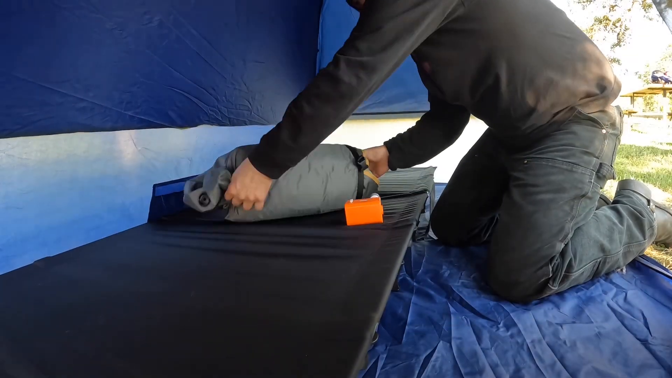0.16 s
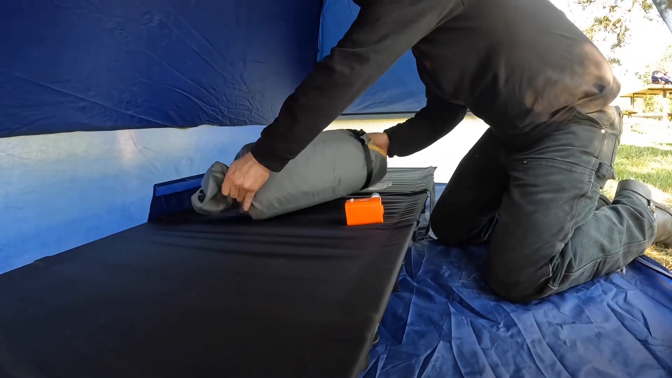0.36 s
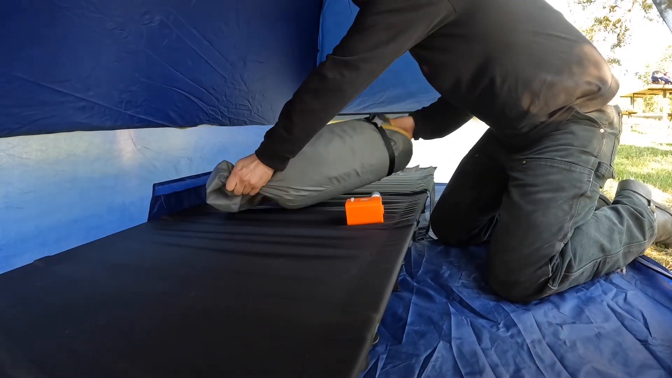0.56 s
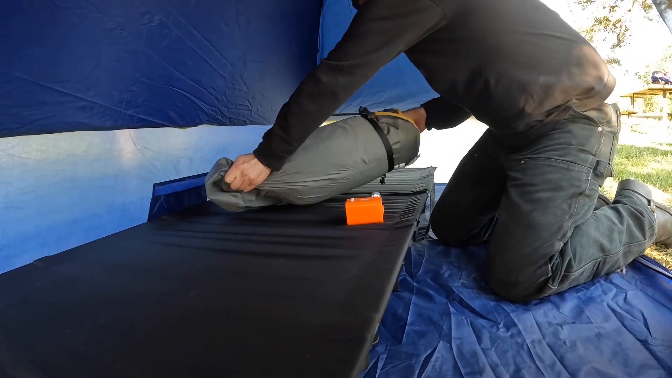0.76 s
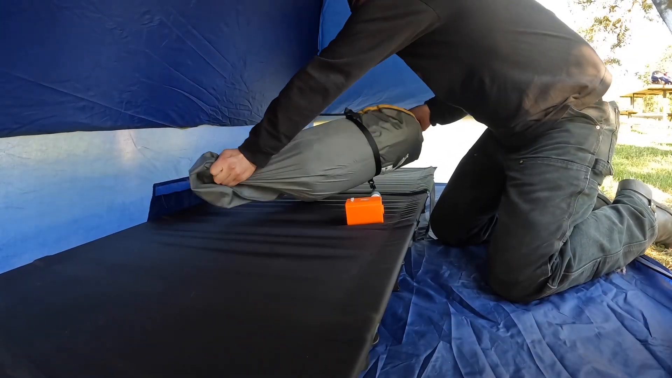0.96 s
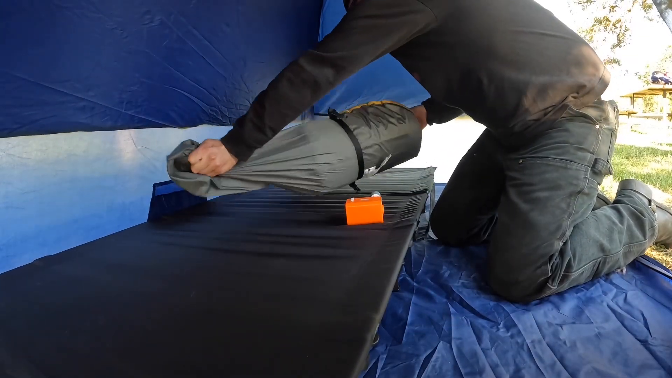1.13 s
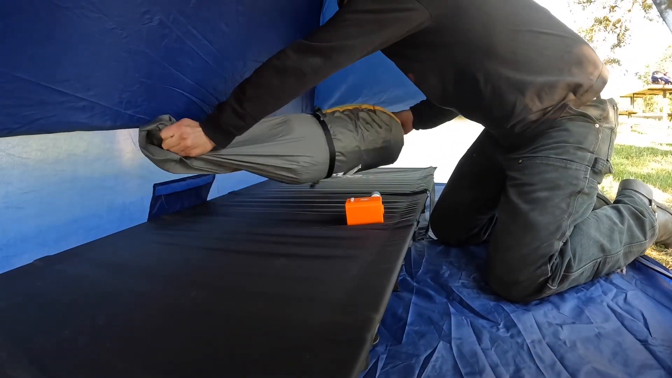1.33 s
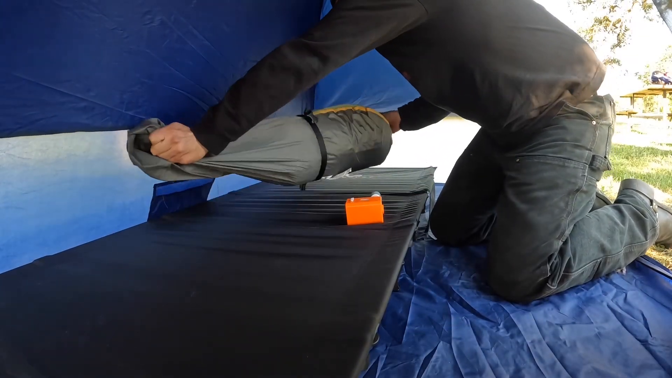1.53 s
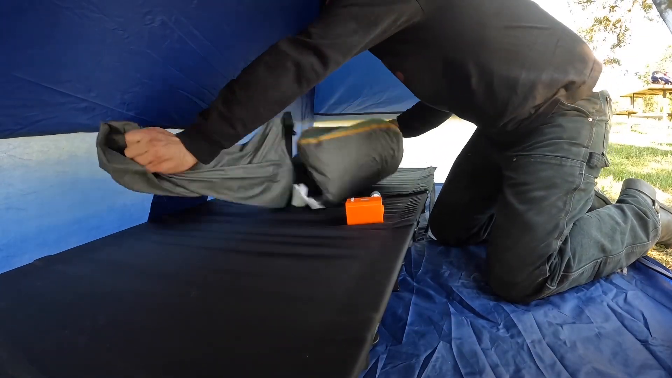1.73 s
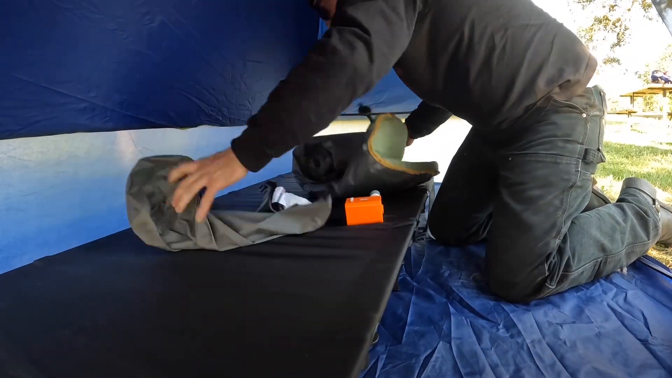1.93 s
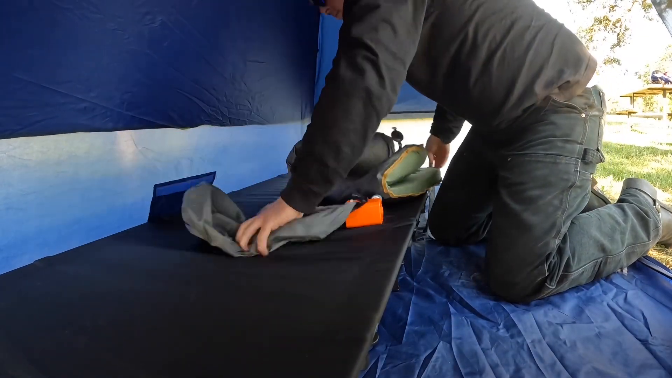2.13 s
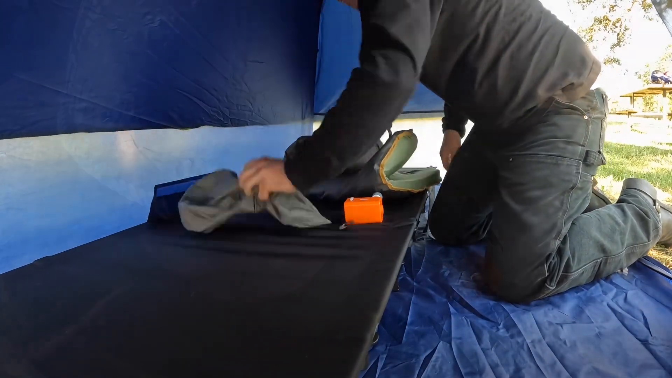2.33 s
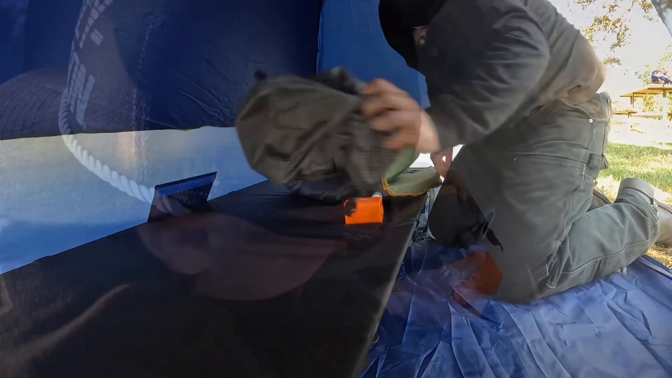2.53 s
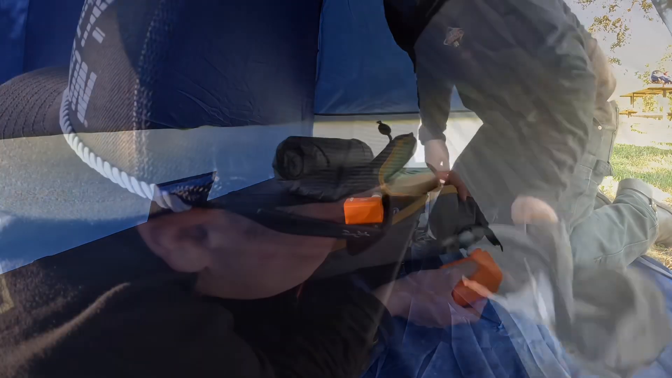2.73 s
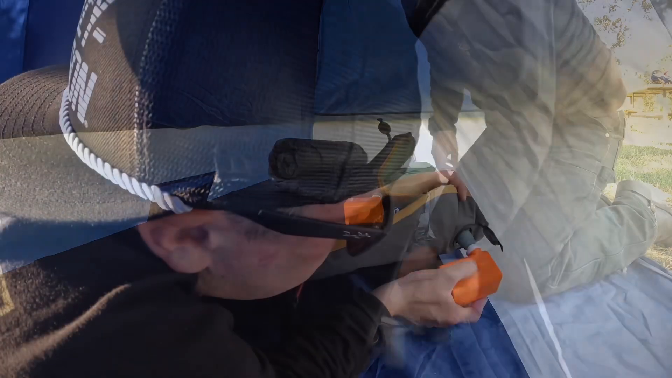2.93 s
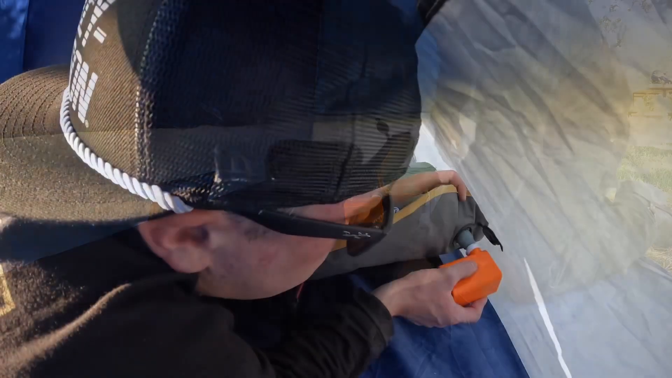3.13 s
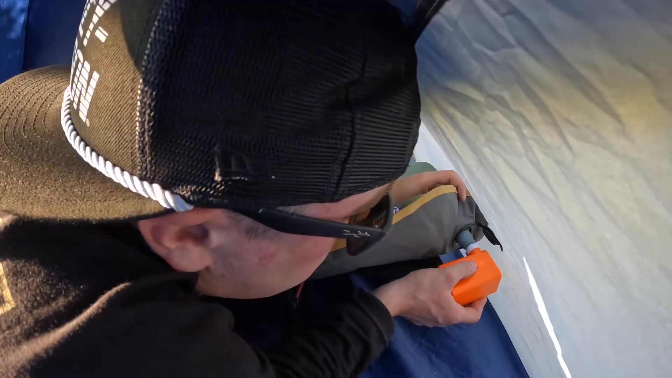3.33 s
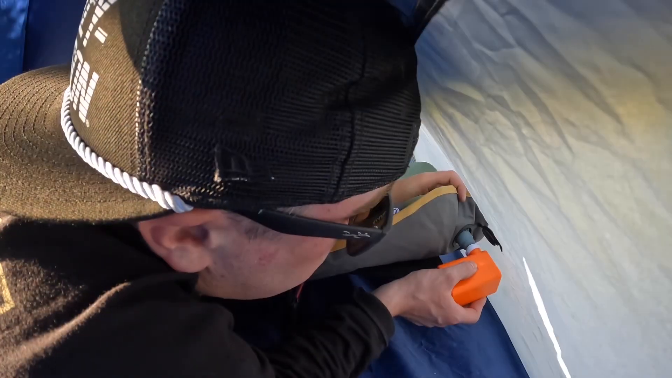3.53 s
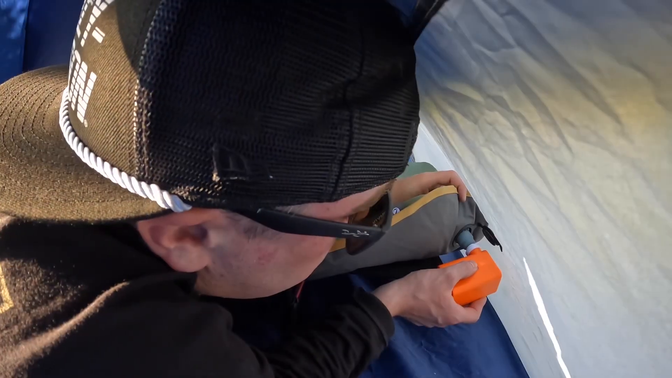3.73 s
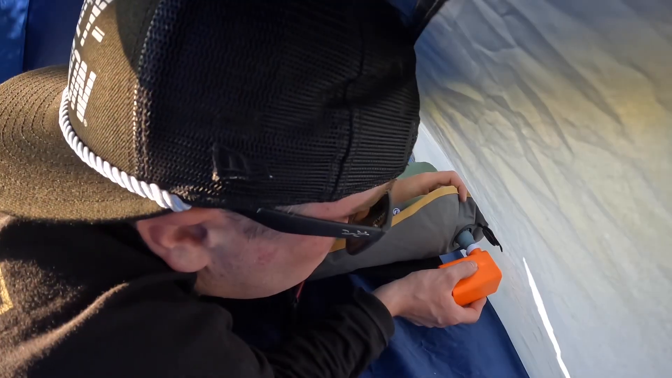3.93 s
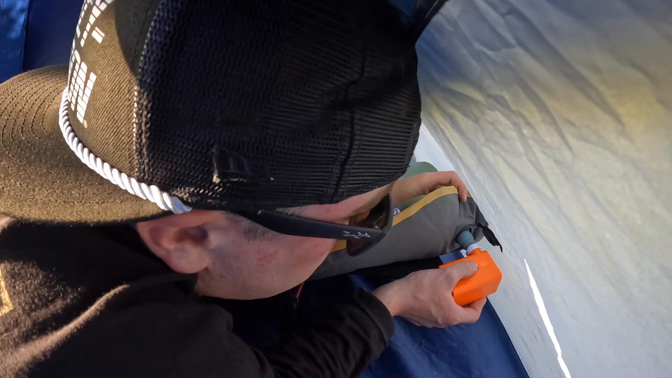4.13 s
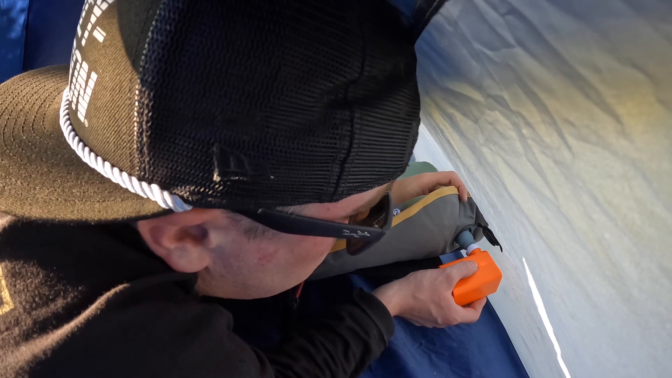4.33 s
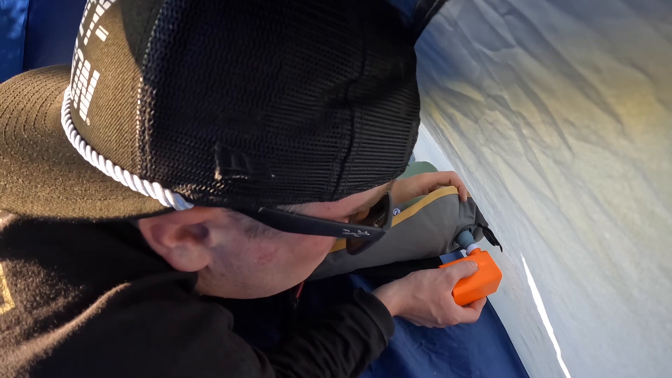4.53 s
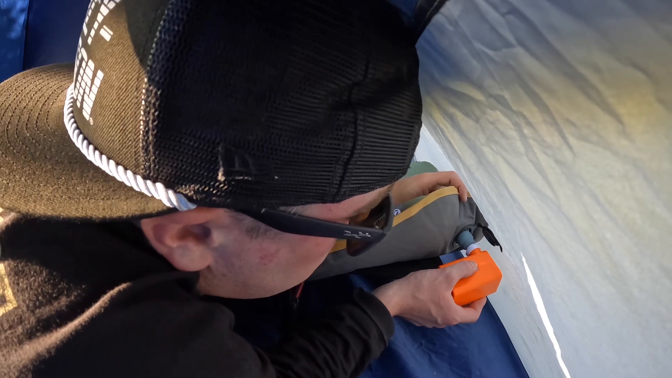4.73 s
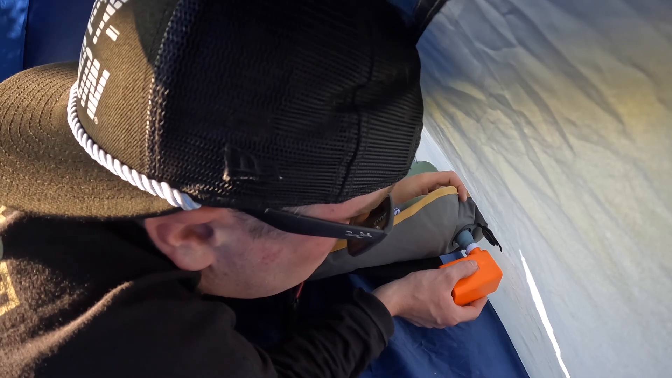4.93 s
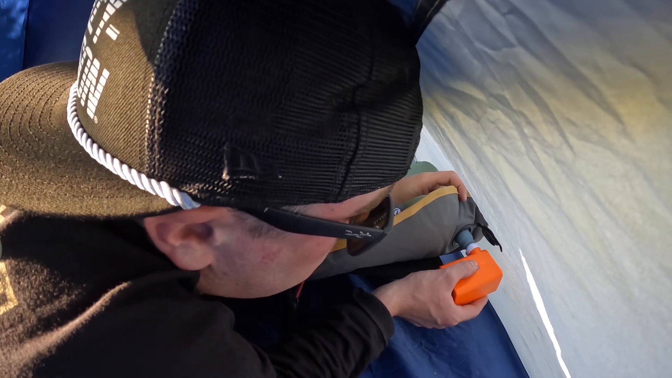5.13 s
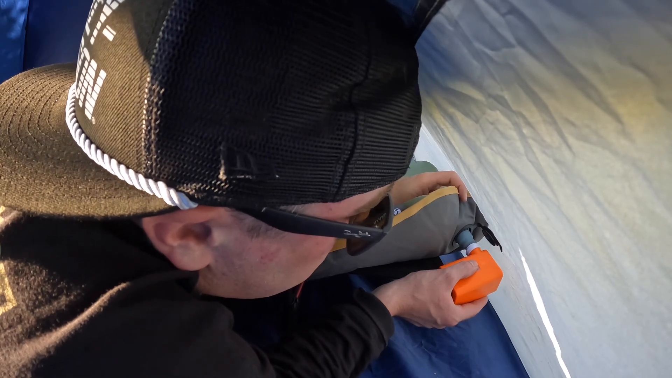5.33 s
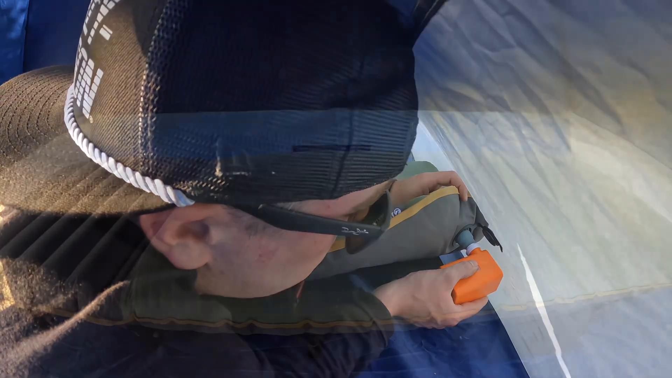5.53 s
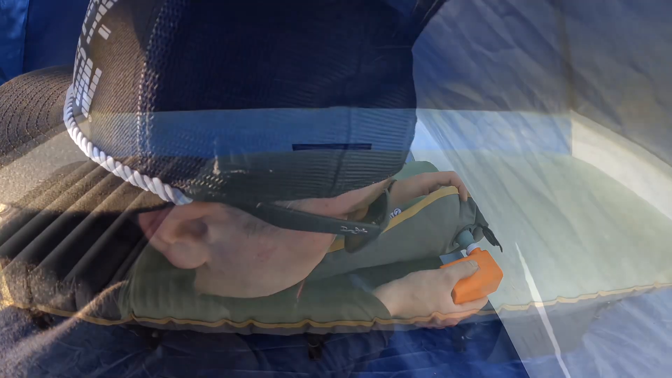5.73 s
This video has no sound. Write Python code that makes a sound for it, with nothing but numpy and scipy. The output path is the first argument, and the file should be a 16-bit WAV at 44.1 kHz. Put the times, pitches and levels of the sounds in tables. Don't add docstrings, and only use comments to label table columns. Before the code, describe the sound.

Close stereo sound in a soft-walled tent, with barely any echo and faint distant traffic rumble throughout. From 0 s, hands drag a nylon sack off a rolled pad: bright, crackling hiss in separate pulls, with a very short, rising high squeak and a crease tap right at the start. Longer sliding strokes run from about 0.55 to 1.4 s. From 1.5 to 2.5 s the handling gets shorter and busier, with sharp buckle-like taps clustered near 2.0 s and a lower rubbery squeak with a hard snap near 2.25 s. Sparse rustles and taps at 2.7-3.0 s fade away. A small plastic click comes at 3.52 s; immediately a battery blower buzzes and sweeps upward, settling by about 3.9 s into a shrill, slightly wavering whine around 3.4 kHz, with rushing air and higher overtones. It holds, dips slightly in pitch near 5.4 s, and fades several decibels by the end, still running.

```python
import sys
import numpy as np
from scipy import signal
from scipy.fft import rfft, irfft, next_fast_len
from scipy.io import wavfile
from scipy.ndimage import uniform_filter1d

SR = 44100
rng = np.random.default_rng(int(sys.argv[2]) if len(sys.argv) > 2 else 0)


def digitize_waveform(pressure):
    field = np.atleast_2d(pressure).T
    bounded = np.clip(field, -1, 1)
    quanta = np.round(bounded * 32767).astype(np.int16)
    wavfile.write(sys.argv[1], SR, quanta)


def volts_from_db(level):
    exponent = np.asarray(level, float) / 20
    return 10 ** exponent


N = 258955
T = np.arange(N) / SR

# (frequency [Hz], width [Hz], level [dB])
HOUSING = [(2460, 260, -7.5), (2874, 260, -2.5), (3063, 117, -0.5), (3390, 1500, -8.5), (4115, 70, -3.5),
           (4070, 38, -20), (4560, 210, -27.5), (4796, 220, 0), (5025, 220, 0), (5210, 110, -2),
           (5720, 330, -4), (6670, 450, -6.5), (7460, 350, -9), (8800, 3600, -18), (10600, 150, -12.5),
           (11800, 1300, -22), (13300, 400, -24)]


def evened(x):
    return x / np.sqrt(np.mean(x ** 2) + 1e-20)


def read(points, hz):
    f, value = np.transpose(points)
    return np.interp(np.log(hz + 1), np.log(f + 1), value)


def curves(rows, t):
    s, *columns = np.transpose(rows)
    return [np.interp(t, s, c) for c in columns]


def add(mix, s, sound):
    part = mix[round(s * SR):][:len(sound)]
    part += sound[:len(part)]


def shaped(x, gain):
    size = next_fast_len(N)
    return irfft(rfft(x, size) * gain(np.fft.rfftfreq(size, 1 / SR)), size)[..., :N]


def resonate(x, hz, width):
    turn = np.exp(2j * np.pi * np.cumsum(hz * np.ones(len(x))) / SR)
    r = np.exp(-np.pi * width / SR)
    return 2 * (turn * signal.lfilter([1 - r], [1, -r], x / turn)).real


def modes(table, steep):
    return lambda hz: np.sqrt(sum(volts_from_db(2 * db) / (1 + (2 * (hz - f) / w) ** 2) ** steep for f, w, db in table))


def flutter(seconds, depth_db):
    size = max(int(seconds * SR), 1)
    smooth = uniform_filter1d(uniform_filter1d(rng.standard_normal(N), size), size)
    return volts_from_db(depth_db * evened(smooth))


def pair(first, second, same):
    alike = lambda hz: np.clip(same(hz), 0, 1)
    shared = shaped(first, lambda hz: np.sqrt((1 + alike(hz)) / 2))
    apart = shaped(second, lambda hz: np.sqrt((1 - alike(hz)) / 2))
    return np.array([shared + apart, shared - apart])


def traffic():
    # (frequency [Hz], density [dB])
    road = [(15, -19), (25, -11.5), (48, -2), (62, -4.5), (100, -1), (135, -9), (250, -19.5), (400, -32),
            (650, -34.5), (996, -26.5), (1300, -34), (2500, -45), (6000, -64.5), (13000, -79)]
    # (time [s], level [dB])
    passing = [(0.0, -33.5), (0.55, -32.5), (0.85, -35), (1.0, -31.5), (1.5, -36), (1.83, -29.5),
               (2.1, -33.5), (2.8, -38.5), (2.92, -33.5), (3.68, -31.5), (4.0, -37), (5.4, -38),
               (5.87, -34.5)]
    noise = evened(shaped(rng.standard_normal((2, N)), lambda hz: volts_from_db(read(road, hz))))
    level = volts_from_db(curves(passing, T)[0] + 0.18) * flutter(0.065, 0.82)
    return level * pair(*noise, lambda hz: .98 - 0.066 * hz / 1000)


def tent(x):
    t = np.arange(5000) / SR
    tail = rng.standard_normal((2, len(t))) * volts_from_db(-60 * t / 0.14) * (t > .003)
    return signal.fftconvolve(x[None], tail / np.linalg.norm(tail[0]), axes=1)[:, :N]


def strokes():
    # (start [s], hold [s], hiss [dB], low scuff [dB], top sheen against hiss [dB])
    pulls = [(0, 0.14, -36, -44, -10), (0.157, 0.083, -51, -57, -11), (0.279, 0.1, -45.5, -58, -6),
             (0.389, 0.054, -36, -51, -6), (0.444, 0.098, -38.5, -40, -5), (0.556, 0.33, -36, -50, -6),
             (.89, 0.3, -36.5, -39, -2.5), (1.211, 0.21, -40, -54, -6.5), (1.488, 0.036, -42.5, -50, -15),
             (1.533, 0.14, -40.5, -45.5, -6), (1.683, 0.088, -38, -40.5, -6.5),
             (1.786, 0.078, -36, -35.5, -8.5), (1.89, 0.07, -43.5, -47, -11),
             (1.972, 0.087, -41, -41.5, -11), (2.066, 0.035, -45.5, -43, -10),
             (2.128, 0.13, -38, -36.5, -12), (2.255, 0.037, -34, -39, -8.5),
             (2.343, 0.057, -42.5, -46, -11), (2.417, 0.038, -45, -39, -16.5),
             (2.508, .015, -46, -41.5, -18), (2.714, 0.0052, -49, -42.5, -28),
             (2.857, 0.026, -43.5, -39, -20), (2.89, 0.058, -49.5, -56, -23), (3.013, .05, -44.5, -47, -13)]
    grip, let_go, settle = 600, 382, 96
    loose_db = -52 - grip * np.maximum(2.3 - T, 0) - settle * np.maximum(T - 3.094, 0)
    knees_db = -54.5 + 0 * T
    power = volts_from_db(2 * np.array([loose_db, knees_db, loose_db - 14]))
    for start, hold, hiss_db, scuff_db, sheen_db in pulls:
        shape_db = -grip * np.maximum(start - T, 0) - let_go * np.maximum(T - start - hold, 0)
        levels_db = np.array([hiss_db, scuff_db, hiss_db + sheen_db])
        power = power + np.outer(volts_from_db(2 * levels_db), volts_from_db(2 * shape_db))
    return np.sqrt(power)


def fabric():
    # (frequency [Hz], density [dB])
    hiss_tone = [(710, -11.5), (1200, -6), (1920, -8.5), (2830, 1.5), (5880, 2), (7520, -2), (9430, -13.5),
                 (10300, -10.5), (12200, -16), (15600, -20.5)]
    scuff_tone = [(120, -44), (250, 5.5), (500, -5), (1200, 1), (2300, -3.5), (3500, -27.5)]
    # (frequency [Hz], left-right likeness [0..1])
    likeness = [(60, 0.64), (180, 0.99), (550, 0.85), (1650, 0.74), (4970, 0.92), (15000, 0.52)]
    # (frequency [Hz], left minus right [dB])
    balance = [(60, 0.0), (180, -2), (550, 1.5), (1650, -0.5), (4970, 0.5), (15000, 5)]
    hiss_gain, scuff_gain, sheen_gain = strokes()
    snaps = rng.random(N) < 500 / SR * flutter(.05, 5.0)
    crackle = volts_from_db(4.8 * np.minimum(rng.exponential(1, N), 5)) * snaps
    drive = rng.standard_normal((2, N)) * (1 + 1.9 * uniform_filter1d(crackle, 20)) * flutter(0.034, 0.91)
    hiss = shaped(drive, lambda hz: volts_from_db(read(hiss_tone, hz)))
    sheen = shaped(hiss, lambda hz: 1 / (1 + (8200 / (hz + 1)) ** 8))
    hiss = evened(hiss - sheen) * hiss_gain + evened(sheen) * sheen_gain * volts_from_db(2.5)
    folds = volts_from_db(7.2 * np.minimum(rng.exponential(1, N), 2.6)) * (rng.random(N) < 200 / SR)
    creased = drive * (1 + 17.0 * uniform_filter1d(folds, 60))
    scuff = evened(shaped(creased, lambda hz: volts_from_db(read(scuff_tone, hz)))) * scuff_gain * volts_from_db(-3.5)
    hands_off = np.clip((3.51 - T) / 0.028, 0, 1)
    both = (hiss * volts_from_db(0.5) + scuff) * hands_off
    lean = lambda hz: volts_from_db(np.outer([.5, -.5], read(balance, hz)))
    return shaped(pair(*both, lambda hz: read(likeness, hz) ** 1.3), lean)


def squeaks():
    # (time [s], level [dB], slip rate [1/s])
    rubs = [
        [(0, -35, 590), (.012, -34, 800), (.028, -25.5, 1100), (.038, -40, 1240), (.049, -30, 1150),
         (.054, -47, 920)],
        [(2.19, -39, 204), (2.205, -39, 178), (2.22, -24.5, 210), (2.232, -23, 236), (2.247, -20.5, 338),
         (2.26, -29.5, 330), (2.271, -43, 430)],
    ]
    # (skin at rest [Hz], tightening [Hz per 1/s], body at rest [dB], body change [dB per 1/s])
    tightening = [(15, 1.1, -17, -0.0027), (-870, 10.4, 22, -0.0924)]
    out = np.zeros(N)
    for rows, (rest_hz, tighten, rest_db, shrink_db) in zip(rubs, tightening):
        t = np.arange(rows[0][0], rows[-1][0], 1 / SR)
        db, slips = curves(rows, t)
        skin_hz = rest_hz + tighten * slips
        body_db = rest_db + shrink_db * slips
        uneven = 1 + .25 * uniform_filter1d(rng.standard_normal(len(t)), 80)
        pulses = np.diff(np.floor(np.cumsum(slips * uneven) / SR), prepend=0)
        pulses = pulses * rng.uniform(.8, 1.2, len(t))
        skin_ring = evened(resonate(resonate(pulses, skin_hz, 280), skin_hz, 630))
        body_ring = evened(resonate(resonate(pulses, 630, 420), 840, 660))
        rub = skin_ring + volts_from_db(body_db) * body_ring
        add(out, t[0], volts_from_db(db) * rub * signal.windows.tukey(len(t), .1))
    return out


def taps():
    # (time [s], peak [dB], ring [Hz], t60 [s], crack against ring [dB])
    snaps = [(.067, -11.5, 1200, 0.014, -14), (0.068, -18, 2410, .007, -11), (0.137, -22, 1175, 0.031, -20),
             (.469, -21, 900, 0.014, -10), (1.062, -17.5, 1500, .008, -4), (1.788, -23, 1000, .012, -12),
             (1.859, -21, 1800, .007, -8), (1.901, -18, 3100, 0.0085, -0.5), (1.947, -23, 1900, 0.0071, -1),
             (1.987, -18, 2200, 0.0043, -20), (1.994, -24, 5540, 0.005, 7.5),
             (2.0162, -11.5, 1710, 0.0056, -6), (2.044, -9, 2150, 0.0055, -14), (2.245, -6, 3600, .004, -2),
             (2.247, -14.5, 5170, 0.018, -12), (2.444, -20, 2200, 0.013, -13), (2.723, -32, 1000, .02, 1.5),
             (2.846, -31, 4630, 0.067, 3), (2.8605, -10, 1220, 0.0085, -20),
             (2.877, -14, 1540, 0.0092, -20), (2.891, -26.5, 2980, 0.034, -3),
             (3.016, -23.5, 2180, 0.027, 0.5), (3.02, -16.5, 2900, 0.009, -23),
             (3.021, -28, 453, 0.052, -30)]
    out, t = np.zeros(N), np.arange(3000) / SR
    for s, db, hz, t60, crack_db in snaps:
        crack = rng.standard_normal(len(t))
        fade = volts_from_db(-60 * t / max(t60, .003)) * np.minimum(t / .0003, 1)
        ring = 0.8 * np.sin(2 * np.pi * hz * t) + 0.44 * evened(resonate(crack, hz, 0.14 * hz))
        wide = evened(resonate(resonate(crack, 2200, 3300), 2200, 3300))
        add(out, s, volts_from_db(db - 4.0) * fade * (ring + volts_from_db(crack_db) * wide))
    return out


def switch_click():
    # (frequency [Hz], level [dB], t60 [s])
    parts = [(3950, -25.5, 0.017), (5000, -51, 0.017), (6150, -48, 0.017), (2800, -31, 0.014),
             (1700, -40, .01), (7560, -25, 0.0076), (11500, -50, 0.005)]
    out, t = np.zeros(N), np.arange(3000) / SR
    snap = rng.standard_normal(len(t))
    click = np.zeros(len(t))
    for hz, db, t60 in parts:
        ring = np.sin(2 * np.pi * hz * t) + 0.4 * evened(resonate(snap, hz, 900))
        click += volts_from_db(db - 60 * t / t60) * ring
    add(out, 3.5238, np.minimum(t / 0.00074, 1) * click)
    return out


def shaft():
    # (time [s], speed [turns/s])
    spin = [(3.554, 90), (3.6, 235), (3.66, 337), (3.69, 375), (3.72, 397), (3.75, 409.8), (3.79, 419),
            (3.84, 424), (3.9, 426.9), (4.04, 428.3), (4.32, 425.5), (4.8, 423.5), (5.08, 424.2),
            (5.16, 422), (5.4, 417.5), (5.52, 421.3), (5.76, 425), (5.87, 424)]
    speed = curves(spin, T)[0]
    turns = 2 * np.pi * np.cumsum(speed * flutter(.01, .008)) / SR
    fade_db = -12.5 * np.maximum(T - 5.427, 0)
    rush_db = -29.5 + 32 * np.log10(speed / 428) + fade_db
    return speed, turns, fade_db, rush_db


def order(k, turns, db, waver_db):
    wave = np.sin(k * turns + 2 * np.pi * rng.random())
    return np.sqrt(2) * volts_from_db(db) * flutter(0.016, waver_db) * wave


def shaft_tones(speed, turns, fade_db, rush_db):
    # (frequency [Hz], level [dB])
    blade = [(2170, -52), (2450, -42), (2650, -41), (2900, -27), (3070, -20.5), (3176, -27), (3280, -21.3),
             (3420, -22)]
    below = [(2540, -50), (2690, -32), (2780, -23.5), (2885, -22), (2926, -27), (2955, -30), (2975, -28),
             (3000, -28.5)]
    double = [(4350, -50), (4850, -24), (5250, -46), (5810, -25), (6250, -42), (6520, -30), (6690, -51),
              (6795, -37)]
    # (multiple, level against the rush [dB])
    weak = [(1, -21.5), (5, -12), (24, -25)]
    enclosed = [(6, -21), (9, -4.5), (10, -9.5), (11, -9.5), (12, -17), (13, -11), (14, -15), (15, -10.5),
                (17, -20), (18, -13), (19, -11.5), (24, -7), (32, -12)]
    tones = order(8, turns, read(blade, 8 * speed) + fade_db + 0.089, 0.33)
    tones = tones + order(7, turns, read(below, 7 * speed) + fade_db + 0.11, 0.98)
    tones = tones + order(16, turns, read(double, 16 * speed) + fade_db + 0.1, 0.93)
    lag_db = -.2 * (428 - speed)
    tones = tones + sum(order(k, turns, db + rush_db + lag_db, 1.0) for k, db in weak)
    strain_db = np.minimum(0.12 * (428 - speed), 6.0)
    housed = sum(order(k, turns, db + rush_db + strain_db, 2.2) for k, db in enclosed)
    return tones + shaped(housed, modes(HOUSING + [(4697, 72, 2.7)], steep=1.03))


def blown_air(turns, rush_db):
    # (frequency [Hz], width [Hz], level [dB])
    low_modes = [(650, 120, -16), (906, 57, -8), (1000, 210, 2), (1118, 72, -4.5), (1290, 220, -5.5),
                 (1725, 500, -6.5)]
    # (frequency [Hz], width [Hz], level [dB])
    casing = [(2880, 200, 4.5), (3720, 380, 0), (2000, 540, -14)]
    # (frequency [Hz], left-right likeness [0..1])
    likeness = [(500, 0.82), (1000, 1), (1500, 0.86), (2500, 1), (3500, 0.99), (3950, 0.35), (4300, 0.85),
                (4800, 1), (6000, 0.96), (6700, 0.62), (7300, 0.96), (8300, 0.75), (13000, 0.68)]
    air = rng.standard_normal((2, 2, N)) * (1 + .2 * np.cos(turns)) * flutter(.02, .4)
    rush = evened(shaped(air[0], modes(HOUSING, steep=1.52))) * volts_from_db(rush_db + 2.5)
    roar = evened(shaped(air[1], modes(low_modes, steep=1.92))) * volts_from_db(rush_db + 3.5 - 1.0)
    buzz_db = -25.5 - 144 * np.maximum(3.62 - T, 0) - 165 * np.maximum(T - 3.62, 0)
    buzz = evened(shaped(air[1], modes(casing, steep=1.2))) * volts_from_db(buzz_db)
    return pair(*(rush + roar + buzz), lambda hz: read(likeness, hz))


def blower():
    # (frequency [Hz], left minus right [dB])
    balance = [(500, 0), (1200, -1.5), (1600, -6.4), (1900, -6), (2400, -.4), (2950, 1.2), (3350, -2.3),
               (3800, 0), (4150, -3), (4800, -.8), (6500, -1.6), (6850, 1.7), (7300, 0), (10300, 1.2)]
    # (frequency [Hz], left lead [rad])
    phase = [(350, 0), (1030, -.4), (1380, -.85), (1700, -.12), (2580, -.08), (2900, -.7), (3300, -1.12),
             (3600, -1.07), (3850, -.4), (4300, -.4), (4700, 0), (6500, 0), (6850, -.3), (7200, 0)]
    # (frequency [Hz], level [dB])
    nozzle = [(600, 0.5), (720, -8), (790, -1.5), (13700, -1), (14100, 0)]
    speed, turns, fade_db, rush_db = shaft()
    on = np.clip((T - 3.554) / 0.0026, 0, 1)
    spun = np.clip((T - 3.61) / 0.034, 0, 1)
    near = on * blown_air(turns, rush_db) + spun * shaft_tones(speed, turns, fade_db, rush_db)

    def at_ports(hz):
        level = volts_from_db(np.outer([.5, -.5], read(balance, hz)))
        lead = np.exp(1j * np.outer([.5, -.5], read(phase, hz)))
        return level * lead * volts_from_db(read(nozzle, hz))

    return shaped(near, at_ports)


def scene():
    hands = taps() + switch_click() + squeaks()
    direct = hands * volts_from_db([[-.3], [.3]])
    return traffic() + volts_from_db(-9.0) * tent(hands) + direct + fabric() + blower()


def top_cut(x):
    return signal.sosfilt(signal.butter(12, 15760, fs=SR, output="sos"), x)


def record(dry):
    # (frequency [Hz], response [dB])
    response = [(20, 0), (12500, -0.5), (13900, -5), (14050, -15), (15700, -7)]
    mix = shaped(dry, lambda hz: volts_from_db(read(response, hz)))
    return top_cut(mix)


dry = scene()
out = record(dry)
digitize_waveform(out)
```